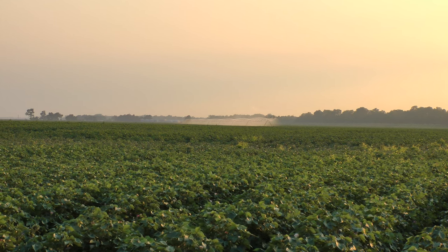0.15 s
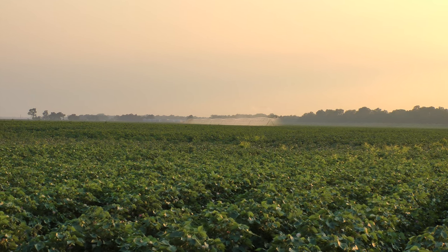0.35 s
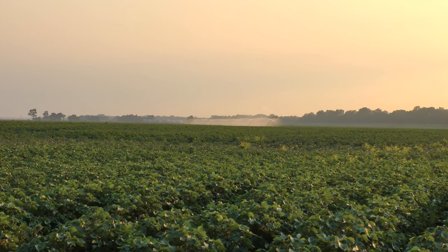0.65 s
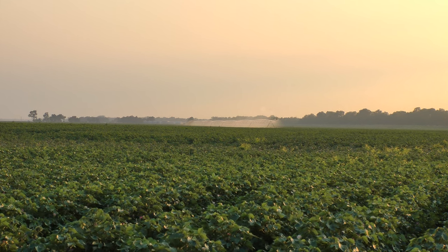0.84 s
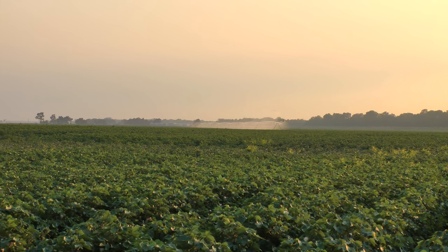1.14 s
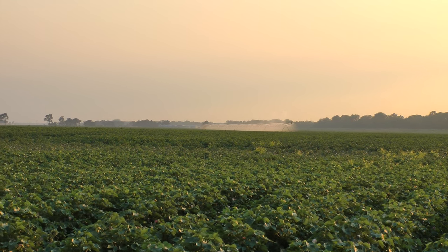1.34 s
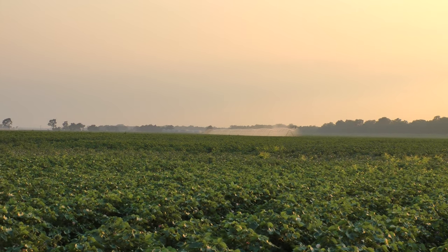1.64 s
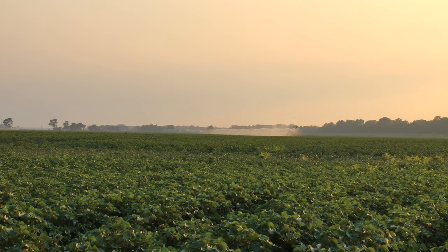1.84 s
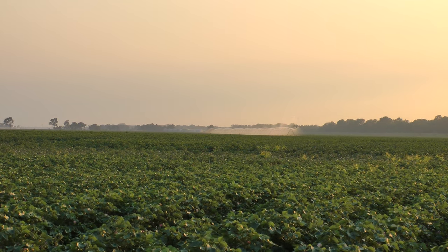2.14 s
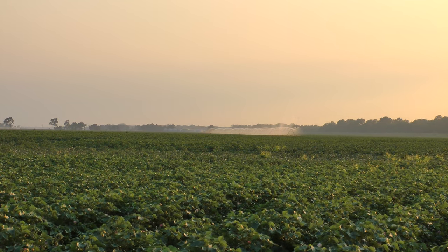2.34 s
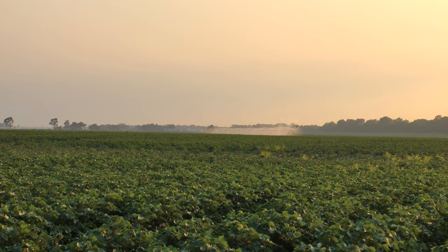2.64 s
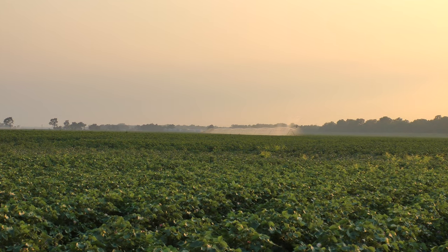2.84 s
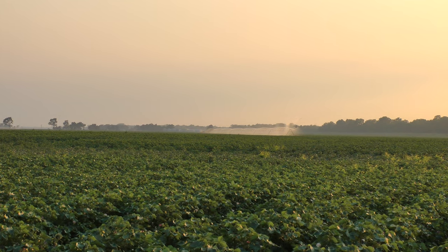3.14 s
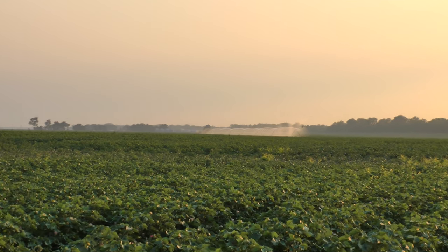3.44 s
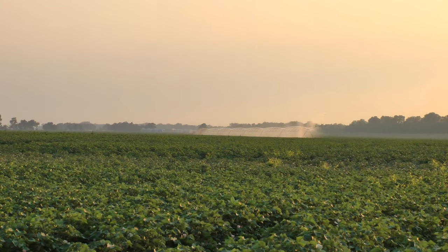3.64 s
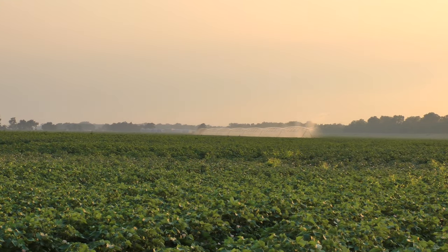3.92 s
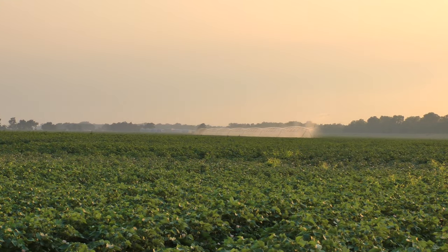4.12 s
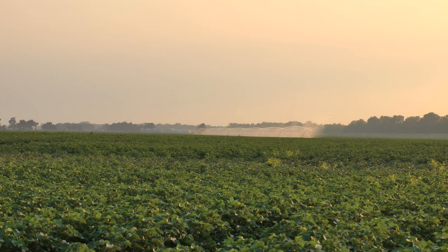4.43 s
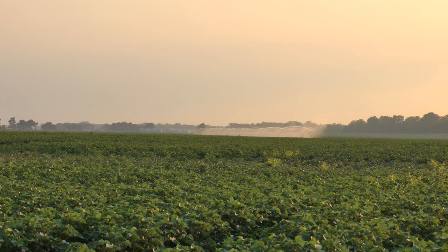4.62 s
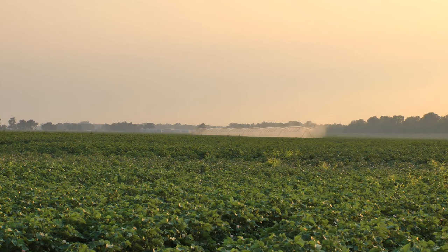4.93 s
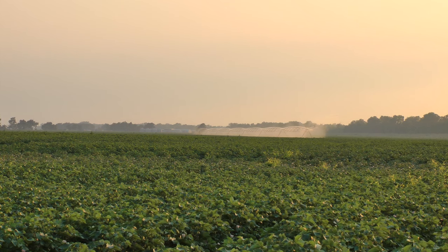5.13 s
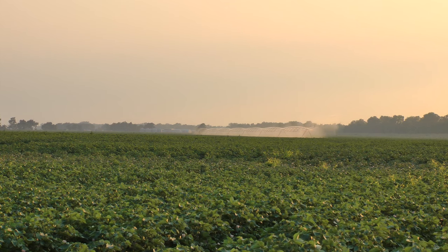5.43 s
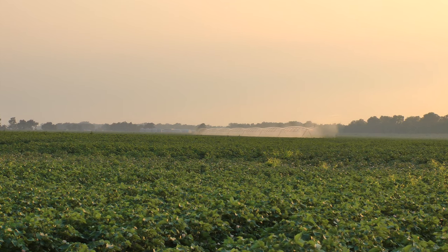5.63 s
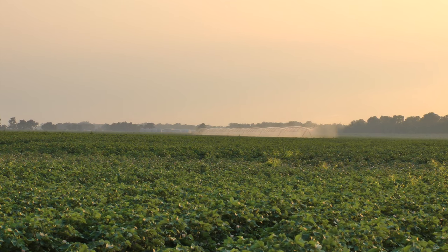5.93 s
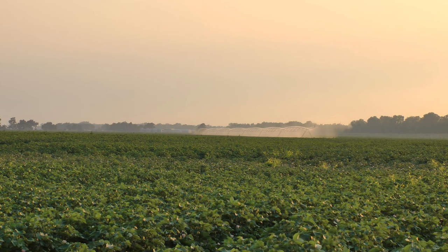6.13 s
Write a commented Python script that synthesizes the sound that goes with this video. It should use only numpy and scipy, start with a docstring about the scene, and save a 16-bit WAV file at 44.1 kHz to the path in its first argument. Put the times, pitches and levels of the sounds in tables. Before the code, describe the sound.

Outdoors in a wide crop field, wind buffets a phone's bare microphone: a low rumble builds over the first second, slams in hard crackling thuds until about three seconds, then subsides. Beneath it a distant irrigation pump engine drones steadily with faint clatter. A small bird trills high and softly, leaves rustle, and one small tick hits the phone after the wind drops.

```python
"""Wind gusts buffet a phone's microphone in a crop field: turbulent pressure, shaped noise with sharp pulses.
Far off drones a four-cylinder irrigation pump, built from engine orders and knocks repeating each cycle.
The field hisses steadily and leaves rustle, both as coloured noise; a small bird trills in gliding sines.
Something ticks once against the phone, ringing the modes of its case.
A limiter ducks the whole sound briefly when a peak passes its ceiling."""
import sys
import numpy as np
from scipy import signal
from scipy.fft import rfft, irfft
from scipy.io import wavfile
from scipy.ndimage import minimum_filter1d

SR = 44100
rng = np.random.default_rng(int(sys.argv[2]) if len(sys.argv) > 2 else 0)


def master_out(mix):
    """Clip the mix to full scale and print it as 16-bit PCM to the path in sys.argv[1]."""
    frames = np.transpose(np.atleast_2d(mix))
    ceiling = np.clip(frames, -1, 1)
    pcm = np.round(ceiling * 32767).astype(np.int16)
    wavfile.write(sys.argv[1], SR, pcm)


N = 276507
TIME = np.arange(N) / SR
FREQ = np.maximum(np.arange(N // 2 + 1) * SR / N, 1)


def undb(db):
    """Level to amplitude: 20 dB is a factor of ten."""
    return 10 ** (np.asarray(db) / 20)


def level(x, db):
    """Root-mean-square level: scale a signal to a given one."""
    return x * undb(db) / np.std(x)


def curves(table):
    """Linear interpolation: join each column of a time table by straight lines."""
    s, *columns = np.transpose(table)
    return [np.interp(TIME, s, column) for column in columns]


def colour(x, spectrum):
    """Spectral shaping: weight a sound by a (f/Hz, level/dB) curve and bring it to rms 1."""
    hz, db = np.transpose(spectrum)
    gain_db = np.interp(np.log(FREQ), np.log(hz), db)
    return level(irfft(rfft(x) * undb(gain_db), N), 0)


def noise():
    """White noise: equal power in every hertz."""
    return rng.standard_normal(N)


def walk(rate):
    """Band-limited fluctuation: smooth chance of spread 1, changing up to about rate/Hz."""
    smooth = np.exp(-(FREQ / rate) ** 2)
    smooth[0] = 0  # no constant offset
    return level(irfft(rfft(noise()) * smooth, N), 0)


def decay(t, t60):
    """Exponential decay: the amplitude falls by 60 dB in t60/s."""
    return np.exp(-np.log(1000) * t / t60)


# gust strength: t/s, relative level of the large eddies/dB, of the small eddies/dB
GUST_LEVELS = [(0.0, -43.5, -55), (0.46, -23, -59), (0.55, -34.5, -56), (1.04, -26, -51), (1.12, -23, -41),
               (1.51, -21.5, -43.5), (1.62, -16.5, -28), (1.95, -26, -52.5), (2.17, -17.5, -41.5),
               (2.28, -27.5, -52), (2.38, -13.5, -30), (2.5, -25.5, -49), (2.63, -23, -40.5),
               (2.75, -25.5, -49), (2.85, -11.5, -28.5), (2.97, -22.5, -37.5), (3.36, -21.5, -42),
               (3.73, -30, -49.5), (3.89, -41.5, -73), (4.24, -32.5, -48), (4.44, -32.5, -71),
               (4.52, -41.5, -79), (4.84, -25, -41.5), (5.13, -26, -52), (6.06, -33, -60),
               (6.12, -29, -51.5), (6.26, -32, -48)]
# spectrum of the large eddies: f/Hz, relative level/dB
LARGE_EDDIES = [(6, -22.5), (16, -3.5), (36, 1.5), (55, -3), (80, -7.5), (120, -15.5), (200, -45),
                (500, -94)]
# spectrum of the small eddies: f/Hz, relative level/dB
SMALL_EDDIES = [(35, -29.5), (75, 0.5), (110, -11), (160, -7.5), (210, -14), (320, -30.5), (600, -43),
                (2000, -83)]
# single hard buffets: t/s, level of the suction peak/dB, half width/s
HARD_BUFFETS = [(1.279, -9, 0.0042), (1.513, -7.5, .0045), (1.633, -7.5, 0.0019), (1.702, -8.5, 0.0031),
                (1.83, -9, .0045), (2.175, -9, 0.0049), (2.298, -8.5, 0.0044), (2.356, -8, 0.0027),
                (2.39, -7, 0.0062), (2.462, -16.5, .0025), (2.8441, -5, 0.0021), (2.871, -5.5, 0.0025),
                (2.909, -4, 0.0039)]


def wind(rumble_db=1.5, flutter_db=4.5, flutter_growth=1.55, full_gust_db=-38, patchy_db=4.0, swing=0.67):
    """Turbulence: large eddies rumble, small ones flutter in bursts, and hard buffets slam into the port."""
    deep_db, small_db = curves(GUST_LEVELS)
    rumble = colour(noise(), LARGE_EDDIES) * undb(deep_db + rumble_db)
    # below a full gust the small eddies die away faster
    weakened_db = full_gust_db + flutter_growth * (small_db - full_gust_db)
    small_db = np.minimum(small_db, weakened_db)
    bursts = noise() * undb(patchy_db * walk(30))
    flutter = colour(bursts, SMALL_EDDIES) * undb(small_db + flutter_db)
    # ordinary turbulence has a bounded pressure swing
    pressure = swing * np.tanh((rumble + flutter) / swing)
    for s, db, width in HARD_BUFFETS:
        pressure = buffet(pressure, (TIME - s) / width, undb(db))
    return pressure


def buffet(pressure, age, strength, push_share=0.5, push_widths=1.98, lead_widths=2.1, refill_widths=1.47):
    """Pressure pulse: push, snap into suction, slow refill; age and widths are in half widths of the buffet."""
    push = np.exp(-((age + lead_widths) / push_widths) ** 2)
    suction = np.exp(-np.where(age < 0, age, age / refill_widths) ** 2)
    # the buffet sweeps the smaller eddies aside as it passes
    pressure = pressure + push * (push_share * strength - pressure)
    return pressure - suction * (strength + pressure)


# engine speed: t/s, firing rate f/Hz
FIRING_RATE = [(0, 56.84), (1.8, 56.65), (2.3, 56.26), (2.8, 56.05), (3.4, 56.75), (4.4, 56.45),
               (5.2, 56.69), (6.27, 56.75)]
# exhaust drone: multiple of the engine cycle rate, rms level before wavering/dB
EXHAUST_ORDERS = [(4, -31.5), (8, -36), (9, -65)]
# upper orders: multiple of the engine cycle rate, rms level before wavering and carry/dB
WHINE_ORDERS = [(20, -78.5), (22, -70.5), (25, -73.5), (32, -73), (34, -59), (35, -65.5), (45, -75.5),
                (51, -77.5), (52, -75), (53, -72.5), (62.3, -73.5)]
# resonances of the pipe: f/Hz, width 6 dB down/Hz, relative level/dB
PIPE_MODES = [(491.2, 74, 1), (645, 17, -15), (770, 250, -10), (1044, 34, -5.5)]
# resonances of the valve cover: f/Hz, width 6 dB down/Hz, relative level/dB
COVER_MODES = [(1115, 101, 5.5), (1843, 470, 0), (2338, 200, -2), (3225, 600, -6.5)]
# how well the engine carries over the field: t/s, gain of whine and knock/dB, of valve rattle/dB
CARRY_GAINS = [(0, -1, -2), (.8, -2.5, 3.5), (1.5, -2.5, 2), (2.2, -0.5, -1), (2.8, -1.5, -1.5),
               (3.6, -0.5, 1.5), (4.3, 0.5, -2), (5.2, -0.5, 1.5), (6.27, -4, -3)]


def pump(exhaust_waver_db=1.64, whine_waver_db=3.0, knock_db=-61.0, rattle_db=-65):
    """Periodic excitation: exhaust drone, whining upper orders and clatter all follow the engine cycle."""
    firing_hz = curves(FIRING_RATE)[0]
    cycle = np.cumsum(firing_hz) / SR / 4  # four firings make one cycle
    whine_gain_db, rattle_gain_db = curves(CARRY_GAINS)
    exhaust = engine_orders(cycle, EXHAUST_ORDERS, exhaust_waver_db)
    whine = engine_orders(cycle, WHINE_ORDERS, whine_waver_db)
    knock = clatter(cycle, PIPE_MODES, knock_db)
    rattle = clatter(cycle, COVER_MODES, rattle_db)
    return exhaust + undb(whine_gain_db) * (whine + knock) + undb(rattle_gain_db) * rattle


def engine_orders(cycle, orders, waver_db):
    """Fourier synthesis: sines at multiples of the cycle, each fading on its own in the moving air."""
    total = np.zeros(N)
    for multiple, db in orders:
        amplitude = np.sqrt(2) * undb(db + waver_db * walk(0.95))
        total += amplitude * np.sin(2 * np.pi * (multiple * cycle + rng.random()))
    return total


def clatter(cycle, modes, clatter_db, loose=0.76, throb=0.38):
    """Forced resonance: knocks, partly alike each cycle and strongest at each firing, ring a body's modes."""
    pattern = rng.standard_normal(size=3112)
    repeated = pattern[(cycle % 1 * len(pattern)).astype(int)]
    firing = np.cos(2 * np.pi * 4 * cycle)
    knocks = (repeated + loose * noise()) * (1 + throb * firing)
    response = sum(undb(db) / (1 + 1j * (FREQ - hz * hz / FREQ) / width) ** 2 for hz, width, db in modes)
    return level(irfft(rfft(knocks) * response, N), clatter_db)


# steady hush of the field: f/Hz, relative level/dB
HUSH_SPECTRUM = [(100, 5.5), (280, 2), (420, 0), (620, 2), (850, -4), (980, -7.5), (1150, -6.5),
                 (1380, -11.5), (1850, -10), (2700, -11), (3800, -9.5), (5200, -19), (7000, -22),
                 (15000, -23.5)]


def field(hush_db=-56.5):
    """Stationary noise: the crop far off hisses evenly."""
    return colour(noise(), HUSH_SPECTRUM) * undb(hush_db)


# bird trills: start t/s, syllables (rounded to whole ones), syllable period/s, pitch at the climax f/Hz,
# level there/dB, climax as a share of the trill, pitch arch/octaves per trill length
BIRD_TRILLS = [(.425, 1, .08, 4560, -61, .5, 0.044), (.90, 3, .085, 3820, -61, .6, 0.14),
               (1.372, 2, 0.089, 3840, -56.5, .5, .03), (1.713, 4, 0.071, 4040, -51.5, .7, .06),
               (1.808, 3, .078, 4650, -59, 0.88, 0.035), (1.68, 5, .076, 3230, -61, 0.72, 0.038),
               (2.135, 2.5, 0.12, 4600, -61, 0.66, .03), (2.146, 2, .095, 6250, -67, .3, .03),
               (2.681, 2, 0.11, 3780, -56, 0.68, 0.12), (3.053, 5.7, .088, 3870, -55.5, .4, 0.019),
               (3.12, 4, 0.092, 4930, -56.5, 0.47, .12), (3.858, 6.3, .078, 3910, -54.5, .2, 0.021),
               (3.898, 5, .077, 5040, -57.5, 1, 0.089), (4.16, 3, 0.035, 4550, -58, 0.53, 0.055),
               (4.523, 3, 0.092, 3900, -57.5, 1, 0.045), (4.539, 5.8, .088, 3150, -60, 0.33, 0.044),
               (4.735, 5, 0.053, 4330, -57, 0.57, .06)]


def syllables(slur_bend=.07, vary=.015, vary_db=1.9, vary_s=.003, swell_db_per_octave=51.5, high_voice_hz=4250):
    """Quasi-periodic repetition: syllables never quite alike, as (t/s, f/Hz, level/dB, bend of the slur)."""
    for start, count, period, climax_hz, climax_db, climax, arch in BIRD_TRILLS:
        count = round(count)
        # between its chips the low voice dips and the high voice arches
        bend = slur_bend * np.sign(climax_hz - high_voice_hz)
        for k in range(count):
            sharp, loud, late = rng.standard_normal(size=3)
            octaves_down = arch * abs((k + .5) / count - climax)
            hz = climax_hz * 2 ** -octaves_down * (1 + vary * sharp)
            # a trill grows louder as it rises in pitch
            db = climax_db - swell_db_per_octave * octaves_down + vary_db * loud
            yield start + k * period + vary_s * late, hz, db, bend


def bird(spacing=.023, half=0.0048, fall=11, rasp=0.018, wander=.011, second_db=-1.5, slur_db=-5.0,
         scatter_db=-5, scatter_t60=0.24):
    """Frequency modulation: each syllable is two quick falling chips joined by a softer slur."""
    # times and widths in s; fall is the share of the pitch lost per second
    song = np.zeros(N)
    quiver = rasp * walk(400) + wander * walk(46)
    for start, hz, db, bend in syllables():
        first = (start, hz, db, fall)
        second = (start + spacing, hz, db + second_db, fall)
        slur = (start + spacing / 2, hz * (1 + bend), db + slur_db, 0)
        for at, note_hz, note_db, slope in (first, second, slur):
            near = slice(int((at - spacing) * SR), int((at + spacing) * SR))
            t = TIME[near] - at
            pitch = note_hz * (1 - slope * t + quiver[near])
            envelope = undb(note_db) * np.exp(-(t / half) ** 2)
            song[near] += envelope * np.sin(2 * np.pi * np.cumsum(pitch) / SR)
    # the foliage scatters a short tail after every note
    t = TIME[:SR // 2]
    tail = rng.standard_normal(len(t)) * decay(t, scatter_t60)
    tail = tail / np.linalg.norm(tail)
    return song + undb(scatter_db) * signal.fftconvolve(song, tail)[:N]


# leaves brushing: centre t/s, half length/s, level at the centre/dB
LEAF_BRUSHES = [(0.694, 0.048, -66), (0.998, 0.12, -68), (1.444, .05, -71), (2.212, 0.029, -61),
                (2.696, 0.085, -66.5), (3.324, 0.14, -67), (3.714, 0.048, -61), (4.46, 0.025, -61),
                (4.577, 0.19, -68), (5.24, 0.053, -61.5), (6, 0.049, -62.5), (6.21, 0.061, -61.5)]
# spectrum of the brushing: f/Hz, relative level/dB
LEAF_SPECTRUM = [(700, -14.5), (2000, 1), (3900, 6), (5500, -5), (8000, -9.5), (15000, -19)]


def leaves(grain_db=3):
    """Amplitude-modulated noise: nearby leaves brush in short grainy swells."""
    swells = sum(undb(db) * np.exp(-((TIME - s) / half) ** 2 / 2) for s, half, db in LEAF_BRUSHES)
    grains = noise() * undb(grain_db * walk(300))
    return swells * colour(grains, LEAF_SPECTRUM)


# contacts with the phone: t/s, relative level/dB
CONTACTS = [(3.6645, -21), (3.6667, 0.5), (3.6674, -25)]
# modes of the case: f/Hz, 60 dB decay time/s, relative level/dB
CASE_MODES = [(1230, 0.033, -10.5), (1460, 0.027, -6.5), (2200, 0.0067, -9), (2980, 0.0074, -10),
              (3500, 0.0074, -0.5), (3900, 0.02, -2.5)]
# spectrum of the contact's crack: f/Hz, relative level/dB
CRACK_SPECTRUM = [(200, 20.5), (900, 0), (2300, 4), (3300, 0), (4100, 3), (4800, -9), (6000, -42),
                  (15000, -28)]


def tick(tick_db=-26, crack_db=-3, crack_t60=0.033, contact_hz=4200):
    """Modal impulse response: one contact, with a faint touch before and a small rebound, rings the case."""
    t = TIME[:SR // 10]
    ring = sum(undb(db) * decay(t, t60) * np.sin(2 * np.pi * hz * t) for hz, t60, db in CASE_MODES)
    crack = colour(noise(), CRACK_SPECTRUM)[:len(t)] * decay(t, crack_t60)
    ring = ring + undb(crack_db) * crack
    contacts = np.zeros(N)
    for s, db in CONTACTS:
        contacts[int(s * SR)] = undb(db + tick_db)
    # the push lasts a fraction of a millisecond, which dulls the top
    push = signal.sosfilt(signal.butter(2, contact_hz, fs=SR, output="sos"), contacts)
    return signal.fftconvolve(push, ring)[:N]


def scene():
    """Superposition: the pressures of all sources add at the one microphone."""
    return (wind() + pump() + field() + bird() + leaves() + tick())[None]


def limiter(x, ceiling_db=-10.5, hold=0.032, release_db_per_s=20, overreach=1.15, attack_hz=4000):
    """Dynamic compression: a peak above the ceiling cuts the gain, which holds (s), then creeps back."""
    over_db = np.maximum(20 * np.log10(np.abs(x) + 1e-9) - ceiling_db, 0)
    # it cuts a little too far and kinks the wave, so the steepest buffets crackle
    cut_db = overreach * over_db
    reach = int(hold * SR / 2)
    # largest cut within the hold time just past
    held_db = -minimum_filter1d(-cut_db, 2 * reach + 1, origin=reach)
    ramp_db = release_db_per_s * TIME
    gain_db = ramp_db - np.maximum.accumulate(held_db + ramp_db)
    # the gain follows within a fraction of a millisecond
    smooth_db = signal.sosfilt(signal.butter(2, attack_hz, fs=SR, output="sos"), gain_db)
    return x * undb(smooth_db)


def record(dry, top_hz=15700):
    """Band limitation: the phone limits the peaks, then a steep low-pass cuts the top."""
    low_pass = signal.ellip(14, .1, 80, top_hz, fs=SR, output="sos")
    return signal.sosfilt(low_pass, limiter(dry[0]))[None]


dry = scene()
out = record(dry)
master_out(out)
```